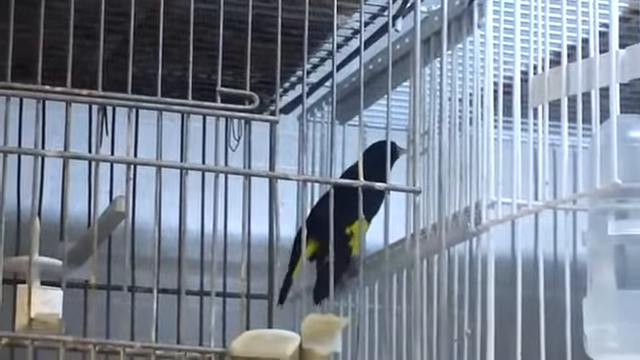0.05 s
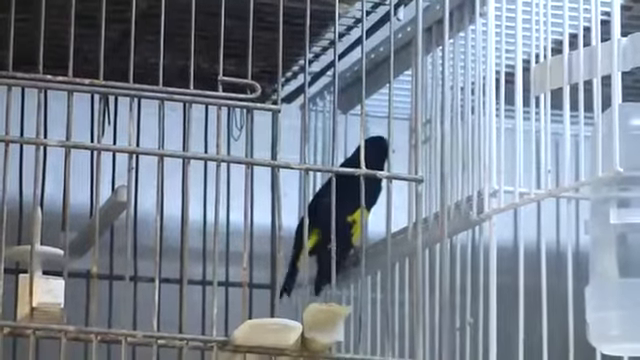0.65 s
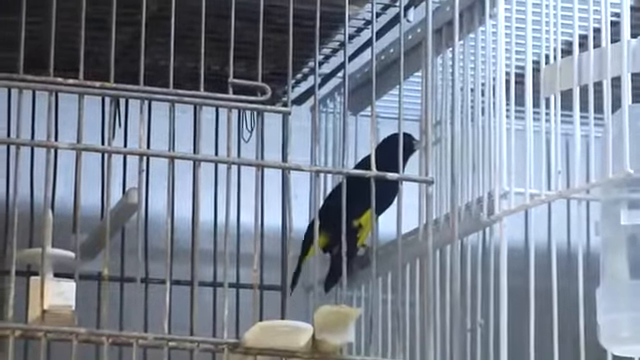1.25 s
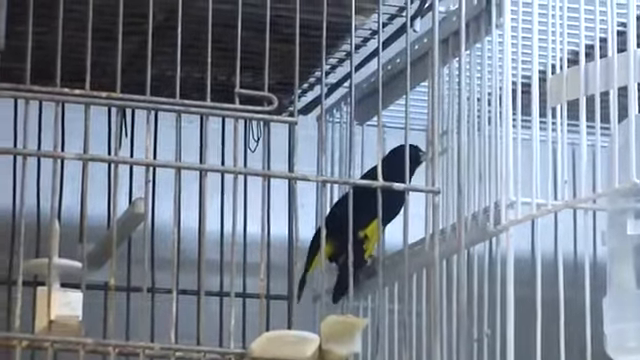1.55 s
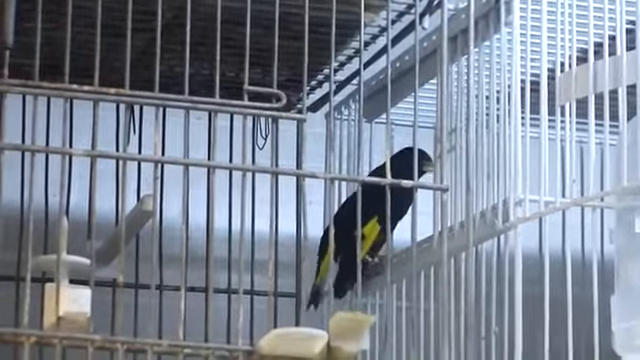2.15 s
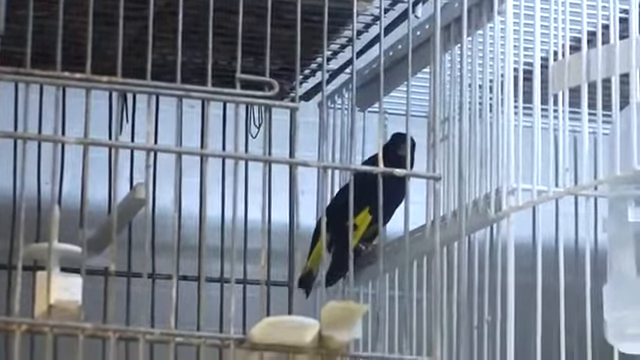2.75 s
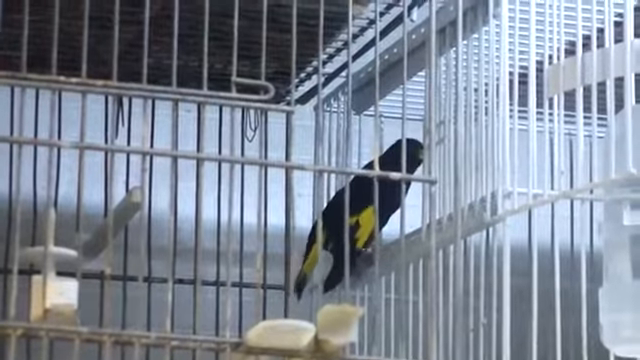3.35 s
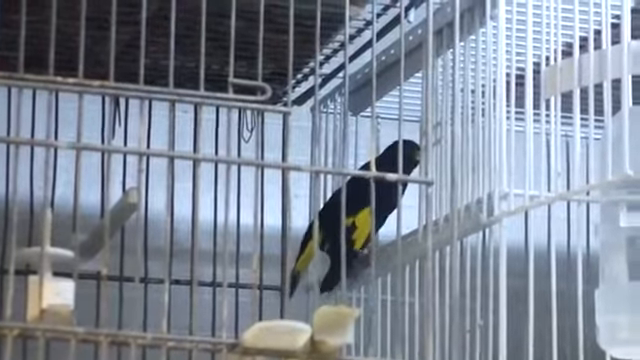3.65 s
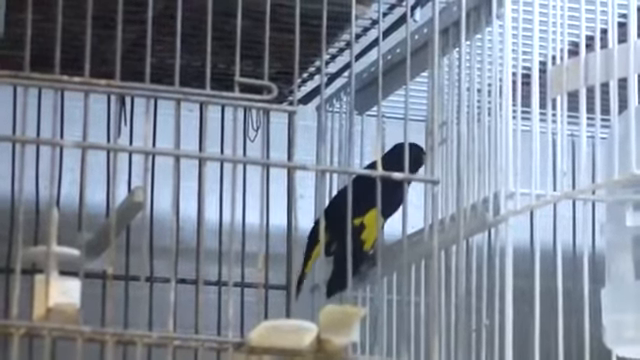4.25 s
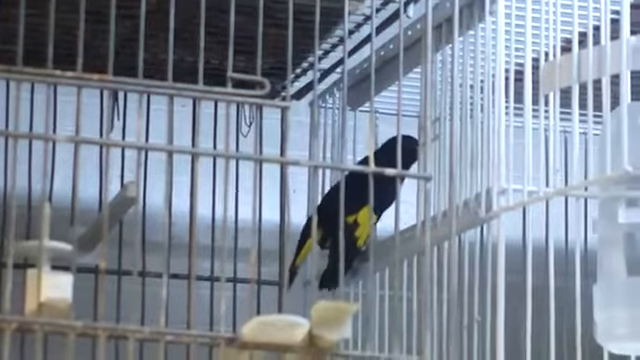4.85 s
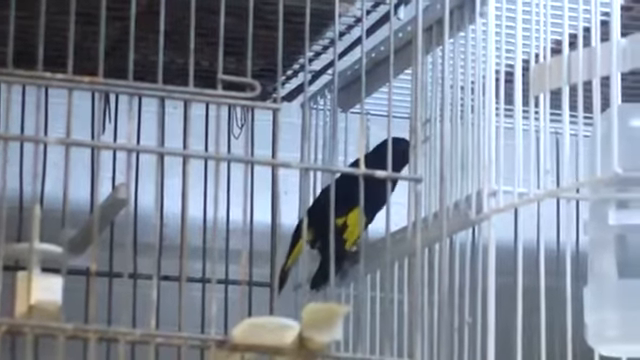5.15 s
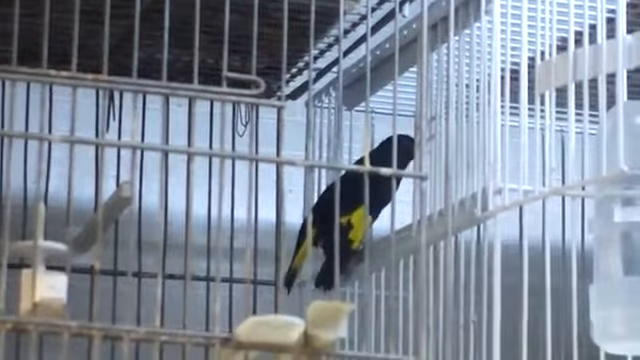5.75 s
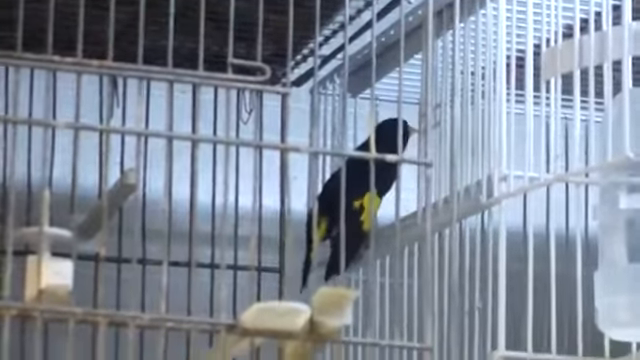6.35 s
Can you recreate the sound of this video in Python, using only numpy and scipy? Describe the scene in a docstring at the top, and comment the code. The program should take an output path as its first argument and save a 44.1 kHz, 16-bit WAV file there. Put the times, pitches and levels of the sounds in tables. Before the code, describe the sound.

A small finch sings in a wire cage in a hard-walled room. It opens with a nasal rising slur and a whistle, runs through quick chips and a high trill, then fast sweeps, hoarse chirps and harsh rasps. After a brief pause comes a loud rising note and more whistles, joined by a bright fluttering rustle. The bird sounds clear and fairly near, with a short ringing echo over faint low room noise and hiss.

```python
"""A small finch sings in a wire cage in a hard-walled room.
The two sides of its voice box (the syrinx) make nasal rising slurs, whistles, paired chips, a high
trill, fast sweeps and harsh rasps, shaped by its throat. The room smears every note over a low murmur
and a faint hiss, and a rustle joins near the end. A limiter turns everything down on the loudest notes."""
import sys
import numpy as np
from scipy import signal
from scipy.fft import rfft, irfft, next_fast_len
from scipy.io import wavfile
from scipy.ndimage import uniform_filter1d, minimum_filter1d

SR = 44100
rng = np.random.default_rng(int(sys.argv[2]) if len(sys.argv) > 2 else 0)


def generate_wav(signal):
    """Clip the signal to [-1, 1] and save it as 16-bit WAV at the path in sys.argv[1]."""
    frames = np.transpose(np.atleast_2d(signal))
    scaled = np.clip(frames, -1, 1) * 32767
    pcm = np.round(scaled).astype(np.int16)
    wavfile.write(sys.argv[1], SR, pcm)


N = 286650  # 6.5 seconds
TOP_HZ = 15300  # the sound is cut off above this


# Nasal notes, one list per note. Each row: time in seconds, pitch in Hz, level in dB,
# throat resonance in Hz, roughness from 0 to 1.
SLUR_NOTES = [
    [(.292, 1273, -29, 5000, 0.94), (.315, 1390, -19.5, 5270, 0.82), (.34, 1561, -21, 4840, 0.1),
     (.38, 1783, -20, 5500, 0.19), (.405, 1941, -22.5, 5750, 0.37), (.425, 2157, -20.5, 5540, 0.31),
     (.47, 2465, -22, 4600, 0.22), (.505, 2267, -22.5, 4550, 0.14), (.535, 2020, -25, 3940, 0.77),
     (.57, 2015, -34, 4430, 0.95), (.66, 2050, -55, 4470, 0.5)],
    [(2.417, 1197, -28, 5070, 1), (2.438, 1416, -19.5, 5070, 0.83), (2.475, 1542, -20, 5100, 0.2),
     (2.52, 1635, -24.5, 4570, 0.8), (2.56, 1850, -24.5, 5370, 0.4), (2.6, 2102, -24, 5930, 0.02),
     (2.625, 2205, -33, 6200, 0), (2.66, 2346, -32, 6540, 0.7)],
    [(2.757, 1783, -27, 4010, 0.74), (2.772, 2098, -19, 4140, 0.24), (2.787, 2463, -22.5, 4830, 0.27),
     (2.808, 2660, -34, 5200, 0.4)],
    [(5.257, 1090, -28, 4800, 0.5), (5.27, 1199, -20, 4300, 0.37), (5.282, 1342, -13, 4400, 0.21),
     (5.3, 1499, -16.5, 4100, 0.3), (5.312, 1630, -22, 4330, 0.3), (5.33, 1775, -22, 3640, 0.32),
     (5.36, 1998, -24.5, 2780, 0.38), (5.4, 2240, -27, 2400, 0.3), (5.42, 2466, -18.5, 2400, 0.06),
     (5.455, 2716, -21.5, 2580, 0.1), (5.5, 2953, -14.5, 2860, 0), (5.55, 3093, -18.5, 3060, 0),
     (5.6, 3270, -15, 3140, 0.02), (5.67, 3378, -22, 3300, 0), (5.69, 3374, -10.5, 3400, 0.02),
     (5.728, 3462, -21.5, 3400, 0.07)],
    [(6.272, 1431, -22.5, 5340, 0.63), (6.3, 1557, -20, 5160, 0), (6.32, 1664, -21, 4970, 0),
     (6.34, 1824, -23, 5340, 0.3), (6.36, 2097, -21, 5170, 0.12), (6.39, 2193, -22, 4800, 0.22),
     (6.425, 2180, -19, 4700, 0), (6.455, 2000, -27.5, 4400, 0.3), (6.5, 1874, -23, 4200, 0.2)],
]

def slurs(throat_width=0.2, leak_db=-26, jitter=0.062, air_db=-7):
    """A buzzy voice: the throat favours the harmonics (multiples of the pitch) near its resonance."""
    out = np.zeros(N)
    harmonic = np.arange(1, 10)[:, None]
    for rows in SLUR_NOTES:
        hz, db, throat_hz, rough = glide(rows)
        phase = syrinx(hz, jitter * rough, rate=1400)
        harmonic_hz = harmonic * hz
        ratio = harmonic_hz / throat_hz
        peak = np.exp(-.5 * (np.log(ratio) / throat_width) ** 2)
        leak = undb(leak_db) / (1 + (harmonic_hz / 6000) ** 2)
        low_side = np.where(ratio < 1, ratio ** 3, 0)  # 18 dB weaker per octave below the resonance
        gain = np.maximum(peak + leak, low_side)
        gain *= np.clip((TOP_HZ - harmonic_hz) / 2000, 0, 1)
        voice = (gain * np.sin(harmonic * phase)).sum(axis=0)
        voice /= np.sqrt((gain ** 2).sum(axis=0) / 2)
        voice *= 1 + rough * wobble(len(hz), rate=1300)
        # air escapes once a cycle while the voice is rough
        puffs = undb(air_db) * rough * breath(len(hz)) * (1 + np.sin(phase))
        # such a small beak gives off almost no bass
        note = colour((voice + puffs) * undb(db), [(700, -28), (1250, 1.0)])
        add(out, rows[0][0], fade(note, edge_s=0.002))
    return out


# Clear notes, one list per note. Each row: time in seconds, pitch in Hz, level in dB.
WHISTLE_NOTES = [
    [(.425, 4170, -26), (.465, 4250, -21.5), (.52, 4060, -23.5), (.557, 3964, -7), (.58, 4150, -35),
     (.6, 4224, -17), (.635, 4226, -17), (.67, 3840, -19.5), (.70, 3496, -24)],
    [(2.52, 3550, -28), (2.555, 4070, -24.5), (2.585, 4282, -17), (2.625, 4215, -24), (2.66, 3990, -20),
     (2.69, 3895, -18), (2.715, 3910, -24)],
    [(2.555, 2580, -42), (2.615, 3150, -35.5), (2.655, 3410, -23), (2.695, 3770, -21.5)],
    [(2.795, 3670, -14), (2.82, 4070, -19), (2.835, 4810, -19), (2.85, 4910, -16), (2.875, 4700, -19),
     (2.905, 4857, -12), (2.914, 4810, -27), (2.921, 3850, -26), (2.955, 3700, -27), (2.98, 3788, -10.5),
     (2.996, 3715, -27), (3.008, 3030, -33)],
    [(3.155, 2450, -50), (3.2, 2330, -46), (3.225, 2300, -50)],
    [(3.243, 3370, -32), (3.265, 3630, -33), (3.295, 3660, -40)],
    [(4.668, 3420, -54), (4.68, 3860, -31), (4.692, 4080, -44)],
    [(5.882, 5460, -26), (5.9, 5613, -20.5), (5.92, 5634, -15.5), (5.942, 5100, -20.5), (5.952, 5350, -19)],
    [(5.973, 2460, -24), (5.988, 2620, -20), (6.015, 2674, -25), (6.035, 2580, -23.5)],
    [(6.135, 5580, -26), (6.16, 5580, -22), (6.18, 5330, -14.5), (6.197, 5670, -28)],
    [(6.212, 2420, -24), (6.23, 2630, -21.5), (6.255, 2650, -22.5), (6.275, 2560, -32)],
    [(6.403, 4650, -18), (6.425, 4700, -25), (6.45, 4590, -37), (6.468, 4120, -17.5), (6.5, 3600, -26)],
]

def whistles(air_db=-22):
    """Almost pure gliding tones, with a little breath."""
    out = np.zeros(N)
    for rows in WHISTLE_NOTES:
        start = rows[0][0]
        hz, db = glide(rows)
        add(out, start, tone(hz, db, octave_db=-28.5, jitter=0.0085, shimmer=0.049))
        add(out, start, fade(breath(len(hz)) * undb(db + air_db)))
    return out


# Short two-voiced notes. Each row: start and length in seconds, the low voice's first and last pitch
# in Hz, the same for the high voice, the low voice's peak level in dB, the high voice in dB
# compared with the low one, each octave in dB compared with its voice.
CHIP_NOTES = [ (0.07, 0.04, 3610, 3880, 4740, 5190, -19.5, -4, -14),
              (0.675, 0.045, 3390, 3910, 4010, 4380, -26.5, 1.5, -11),
              (0.793, 0.049, 3334, 4000, 3890, 4410, -30.5, 2, -6),
              (0.916, 0.046, 3785, 4140, 4470, 4890, -25.5, -0.5, -5.5),
              (1.032, 0.046, 3820, 4290, 4640, 4970, -23.5, -3.5, -5.5),
              (1.137, 0.051, 3820, 4300, 4650, 5000, -24.5, -2, -5),
              (1.246, 0.053, 3910, 4264, 4775, 4966, -25, -2.5, -3.5),
              (1.361, .054, 3680, 4370, 4610, 5010, -24, -3.5, -4.5),
              (1.468, .054, 3836, 4370, 4690, 5100, -23, -3.5, -5),
              (1.574, 0.048, 3860, 4290, 4710, 5050, -23, -2.5, -4),
              (1.674, 0.046, 4217, 4445, 5570, 5170, -20.5, -2, -8.5), ]

def chips(bend=1.297):
    """Both sides of the syrinx glide at once, a few notes apart."""
    out = np.zeros(N)
    for start, length, low_from, low_to, high_from, high_to, db, high_db, octave_db in CHIP_NOTES:
        progress = np.linspace(0, 1, int(length * SR))
        swell_db = db + np.interp(progress, [0, 0.95, 1], [-6, 0, -5])
        low_hz = low_from + (low_to - low_from) * progress ** bend
        high_hz = high_from + (high_to - high_from) * progress ** bend
        add(out, start, tone(low_hz, swell_db, octave_db, jitter=0.008))
        add(out, start, tone(high_hz, swell_db + high_db, octave_db, jitter=0.014))
    return out


# Bell-like notes. Each row: start in seconds, upper pitch in Hz, its level in dB, lower pitch in Hz,
# its level in dB.
TRILL_NOTES = [(1.788, 7400, -22, 5680, -23.5), (1.873, 7410, -21, 5770, -22.5),
               (1.957, 7360, -21.5, 5680, -21), (2.045, 7320, -24, 5675, -21.5),
               (2.132, 7330, -21.5, 5760, -21.5), (2.235, 7230, -22.5, 5715, -22),
               (2.327, 7230, -20, 5680, -22.5)]
# How each voice moves. Each row: seconds into the note, pitch multiplier, level change in dB.
TRILL_UPPER = [(0, 1.017, -5), (.007, 1.014, -1), (.026, .997, 2), (.04, .965, -20)]
TRILL_LOWER = [(0, 1.02, -4.5), (.014, 1.04, -3.5), (.023, 1.0, -1), (.032, .965, 1.5), (.04, 0.963, -2.5)]
# Two faint tones, one below and one above. Each row: seconds into the note, pitch in Hz, level in dB.
TRILL_SIDE_TONES = [
    [(.012, 4520, -53), (.024, 4040, -47.5), (.038, 3610, -49.5)],
    [(.002, 9560, -49.5), (.014, 10350, -42.5), (.036, 10040, -59)],
]

def trill():
    """A run of high notes: in each, the upper voice peaks first and the lower swells in under it."""
    out = np.zeros(N)
    for start, upper_hz, upper_db, lower_hz, lower_db in TRILL_NOTES:
        for shape, hz, db in (TRILL_UPPER, upper_hz, upper_db), (TRILL_LOWER, lower_hz, lower_db):
            ratio, swell_db = glide(shape)
            add(out, start, tone(hz * ratio, db + swell_db, octave_db=-28, jitter=.006, shimmer=.08))
        for rows in TRILL_SIDE_TONES:
            add(out, start + rows[0][0], tone(*glide(rows), octave_db=-60, jitter=.025))
    return out


# Falling sweeps. Each row: start and length in seconds, first and last pitch in Hz, level in dB,
# level of the closing pip in dB.
FLICK_NOTES = [(2.916, 0.011, 6290, 4000, -27, -31), (2.989, .014, 6500, 3880, -23.5, -26),
               (3.074, .014, 6770, 4320, -23.5, -25), (3.188, 0.0095, 6730, 3980, -22, -24.5),
               (3.303, 0.0092, 6590, 4070, -20, -24), (5.821, 0.021, 7540, 4440, -18, -60),
               (6.066, 0.026, 7600, 4320, -18.5, -60)]

def flicks(pip_hz=6910, pip_s=0.013):
    """The pitch plunges and levels off, then a tiny high pip follows."""
    out = np.zeros(N)
    pip_pitch = np.full(int(pip_s * SR), pip_hz)
    for start, length, from_hz, to_hz, db, pip_db in FLICK_NOTES:
        fall = np.linspace(1, 0, int(length * SR)) ** 2
        hz = to_hz + (from_hz - to_hz) * fall
        add(out, start, tone(hz, db, octave_db=-15, jitter=0.038, shimmer=0.21))
        add(out, start + length, tone(pip_pitch, pip_db, octave_db=-24, jitter=0.047))
    return out


# Fast chirps. Each row: start in seconds, pitch multiplier for the two voices, level in dB.
CHIRP_NOTES = [(3.401, 1.024, -20.5), (3.509, 0.99, -20), (3.617, 1.01, -20), (3.75, 1.004, -19),
               (3.844, 1.035, -19.5), (3.945, .97, -20), (4.061, 1.01, -19.5), (4.182, 1.03, -19)]
# The three parts of a chirp. Each row: seconds into the chirp, pitch in Hz, level change in dB.
CHIRP_RISE = [(0, 2195, -25), (.009, 2903, -12), (.018, 3822, 0), (.027, 4900, -0.5), (.034, 4930, -17)]
CHIRP_FALL = [(.005, 5776, -9), (.012, 4670, -15), (.02, 3880, -2.5)]
CHIRP_END = [(.018, 5630, -13), (.026, 6344, -4), (.035, 6450, -2)]

def chirps(air_db=-7):
    """Two hoarse voices cross, one rising and one falling, and end on a high tip."""
    out = np.zeros(N)
    for start, ratio, db in CHIRP_NOTES:
        hz, swell_db = glide(CHIRP_RISE)
        add(out, start, tone(hz * ratio, db + swell_db, octave_db=-17, jitter=.09, shimmer=.7))
        add(out, start, fade(breath(len(hz)) * undb(db + swell_db + air_db)))
        hz, swell_db = glide(CHIRP_FALL)
        falling = tone(hz * ratio, db + swell_db, octave_db=-1, jitter=0.066, shimmer=0.98)
        add(out, start + CHIRP_FALL[0][0], falling)
        hz, swell_db = glide(CHIRP_END)
        tip = tone(hz, db + swell_db, octave_db=-2, jitter=0.02, shimmer=0.35)
        add(out, start + CHIRP_END[0][0], tip)
    return out


# Harsh notes. Each row: start and length in seconds, slaps per second, peak level in dB,
# throat resonance in Hz, treble boost in dB.
RASP_NOTES = [(0.526, 0.033, 999, -26, 3820, 6), (2.772, 0.031, 1095, -22.5, 4520, 8),
              (3.527, 0.039, 797.6, -21, 3670, 10), (4.22, 0.047, 1029, -18.5, 3820, 15.5),
              (4.327, 0.052, 716, -18, 3980, 5), (4.435, 0.075, 600, -19, 3520, 1.5),
              (4.562, 0.085, 598, -19.5, 3410, 2.5), (4.709, 0.075, 623, -18.5, 3290, 2.5),
              (4.846, 0.078, 639.3, -19, 3290, 0.5), (5.348, 0.039, 755, -20.5, 4330, 5)]
# What the open throat lets through. Each row: frequency as a multiple of its resonance, gain in dB.
OPEN_THROAT = [(.25, -51), (.38, -18.5), (.5, -6.5), (.75, 0), (1, 0), (1.3, 1), (1.6, -12), (2, -24.5),
               (3, -36.5), (4.5, -51)]

def rasps(jitter=.3, scatter_db=2):
    """The membranes of the syrinx slap unevenly; each slap rings the wide-open throat."""
    out = np.zeros(N)
    for start, length, rate_hz, db, throat_hz, treble_db in RASP_NOTES:
        swell_db, = glide([(0, -10), (length / 2, 0), (length, -8)])
        count = len(swell_db)
        cycles = syrinx(np.full(count, rate_hz), jitter, rate=700) // (2 * np.pi)
        slaps = np.diff(cycles, prepend=0) * undb(scatter_db * wobble(count, rate=900))
        voice = colour(slaps, [(ratio * throat_hz, gain) for ratio, gain in OPEN_THROAT])
        voice = colour(voice, [(5000, 0), (8000, treble_db)])
        add(out, start, fade(unit(voice) * undb(db + swell_db)))
    return out


def syrinx(hz, jitter, rate):
    """Phase (place in the cycle) of a vibrating membrane; jitter makes its pitch tremble."""
    trembling_hz = hz * (1 + jitter * wobble(len(hz), rate))
    return 2 * np.pi * np.cumsum(trembling_hz) / SR


def tone(hz, db, octave_db, jitter, shimmer=0):
    """One side of the syrinx sings a pitch and its octave; shimmer shakes the level for hoarseness."""
    phase = syrinx(hz, jitter, rate=1500)
    size = np.sqrt(2) * undb(db) * (1 + shimmer * wobble(len(hz), rate=2200))
    wave = np.sin(phase) + undb(octave_db) * np.sin(2 * phase)
    return fade(size * wave, edge_s=0.0021)


def breath(count):
    """Air rushes through the open beak."""
    beak = [(1200, -22.5), (2500, -15), (4500, 2.5), (7000, -1.5), (10000, -12.5)]
    return unit(colour(rng.standard_normal(count), beak))


# Where the room rings most. Each row: pitch in Hz, level in dB compared with the direct sound.
ROOM_RINGS = [(2424, -9), (2620, -7.5), (2952, 3.5), (3233, 2.5), (3394, 7), (3805, 2), (3963, -12),
              (4218, -10), (4512, -6), (4745, -8), (4877, 12.5), (5304, -19), (5634, -17), (7286, -4)]

def room(song, direct_db=-6, cage_db=-7, walls_db=-6, tail_db=-10):
    """The cage and close walls throw back quick, dense echoes; the room rings on longer and duller."""
    t = np.arange(int(.8 * SR)) / SR
    fall_db = -60 * t  # divided below by the seconds each echo takes to drop 60 dB
    noise = rng.standard_normal((3, len(t)))
    cage = unit(noise[0] * undb(fall_db / 0.028) * (t > .001))
    walls = unit(noise[1] * undb(fall_db / 0.18) * (t > .004))
    tail = unit(noise[2] * undb(fall_db / 0.35) * np.minimum(t / 0.036, 1))
    tail = colour(tail, [(4500, 0.0038), (10000, -5)])
    echoes = (undb(cage_db) * cage + undb(walls_db) * walls + undb(tail_db) * tail) / np.sqrt(len(t))
    decay = undb(fall_db / 0.2)
    rings = sum(undb(db) * np.cos(2 * np.pi * hz * t) for hz, db in ROOM_RINGS)
    rings *= undb(direct_db) * 2 * decay / decay.sum()
    return undb(direct_db) * song + signal.fftconvolve(song, echoes + rings)[:N]


# How far the murmur is turned up or down. Each row: time in seconds, level in dB before the boost.
MURMUR_VOLUME_CURVE = [(0.0, -49.5), (0.31, -47.5), (0.43, -55.5), (1.03, -46), (1.25, -48.5), (1.52, -44),
                       (1.9, -48.5), (2.43, -49), (2.48, -55.5), (2.64, -57.5), (2.79, -52), (2.86, -60),
                       (3.19, -50), (3.37, -53), (3.64, -49.5), (3.82, -52), (3.84, -49.5), (3.89, -53.5),
                       (4.34, -49), (5.19, -48), (5.36, -52), (5.5, -48), (5.54, -54), (5.9, -51.5),
                       (5.96, -56), (6.06, -50), (6.28, -51.5), (6.35, -58), (6.48, -56.5), (6.5, -52)]
# Its balance of low and high. Each row: frequency in Hz, relative strength in dB.
MURMUR_TONE = [(25, -16.5), (45, -12.5), (62, -4.5), (85, -7), (160, -9.5), (230, -0.5), (450, 3),
               (700, -1), (1100, -4.5), (2000, -9), (3500, -16.5), (6000, -21), (15000, -34)]

def murmur(boost_db=2):
    """A low murmur whose level sinks and swells along a set curve."""
    return undb(boost_db) * shaped_noise(MURMUR_VOLUME_CURVE, MURMUR_TONE)


# The rustle's loudness. Each row: time in seconds, level in dB.
RUSTLE_LEVELS = [(5.87, -46), (5.91, -38.5), (5.96, -32.5), (6.1, -30), (6.25, -29), (6.36, -28),
                 (6.5, -32.5)]
# Its balance of low and high. Each row: frequency in Hz, relative strength in dB.
RUSTLE_TONE = [(900, -45), (1350, -19), (1600, -6.5), (2500, -5.5), (4000, 0.5), (5500, 0), (7000, -6),
               (10000, -11.5), (15000, -18)]

def rustle(flutter_db=3):
    """A bright, fluttering noise joins near the end."""
    noise = shaped_noise(RUSTLE_LEVELS, RUSTLE_TONE)
    flutter = undb(flutter_db * wobble(N, rate=60))
    started = np.arange(N) / SR > RUSTLE_LEVELS[0][0]
    return noise * flutter * started


# The hiss's loudness. Each row: time in seconds, level in dB.
HISS_LEVELS = [(0, -53), (.6, -57), (1.1, -45.5), (2.3, -48), (2.7, -52), (3.3, -38.5), (4.2, -46),
               (4.7, -58), (5.2, -60), (5.8, -49), (6.5, -55)]
# Its balance of low and high. Each row: frequency in Hz, relative strength in dB.
HISS_TONE = [(1200, -21.5), (3000, -4), (4500, -8.5), (7000, 0), (10000, -6), (15000, 1)]

def hiss():
    """A faint high noise slowly swells and fades."""
    return shaped_noise(HISS_LEVELS, HISS_TONE)


def shaped_noise(levels, points):
    """Filtered noise whose loudness follows (seconds, dB) rows."""
    db = np.interp(np.arange(N) / SR, *np.transpose(levels))
    return unit(colour(rng.standard_normal(N), points)) * undb(db)


def undb(db):
    """Turn decibels into a multiplier."""
    return 10 ** (np.asarray(db) / 20)


def unit(x):
    """Scale to an average strength (rms) of 1."""
    return x / np.sqrt(np.mean(x ** 2) + 1e-18)


def add(out, start, x):
    """Mix a sound in at a start time in seconds."""
    i = max(int(start * SR), 0)
    out[i:i + len(x)] += x[:max(N - i, 0)]


def glide(rows):
    """Join (seconds, values..) rows with straight lines: one curve per value column."""
    times, *columns = np.transpose(rows)
    count = max(int((times[-1] - times[0]) * SR), 64)
    t = times[0] + np.arange(count) / SR
    return [np.interp(t, times, column) for column in columns]


def colour(x, points):
    """Turn frequencies up or down along (Hz, dB) points."""
    hz, db = np.transpose(points)
    size = next_fast_len(2 * len(x))
    freqs = np.maximum(np.fft.rfftfreq(size, 1 / SR), 1)
    gain = undb(np.interp(np.log(freqs), np.log(hz), db))
    return irfft(rfft(x, size) * gain, size)[:len(x)]


def wobble(count, rate):
    """A random curve, roughly 1 in size, that picks a new value rate times a second."""
    i = np.arange(count)
    return np.interp(i * min(rate / SR, 1), i, rng.standard_normal(count))


def fade(x, edge_s=0.0026):
    """Open and close a note softly."""
    i = np.arange(len(x))
    ramp = np.minimum(np.minimum(i, i[::-1]) / (edge_s * SR), 1)
    return x * np.sin(np.pi / 2 * ramp) ** 2


def scene():
    """The finch in its room, over the background noises."""
    song = slurs() + whistles() + chips() + trill() + flicks() + chirps() + rasps()
    return (room(song) + rustle() + murmur() + hiss())[None]


# Dull top treble, with a deep dip near 11.5 kHz. Each row: frequency in Hz, gain in dB.
TREBLE_SHAPE = [(20, 0), (10300, 1), (11000, -4), (11500, -48), (14300, -9), (15100, -37)]

def record(dry, limit_db=-15, ratio=3):
    """The top treble is dulled, and cut above 15 kHz; a limiter holds down the loudest notes."""
    x = colour(dry[0], TREBLE_SHAPE)
    window = 441  # samples, a hundredth of a second
    loudness = np.sqrt(np.abs(uniform_filter1d(x ** 2, window)))
    gain = np.maximum(loudness / undb(limit_db), 1) ** (1 / ratio - 1)
    smooth_gain = uniform_filter1d(minimum_filter1d(gain, window), window)
    treble_cut = signal.ellip(8, .2, 70, TOP_HZ, fs=SR, output="sos")
    return signal.sosfilt(treble_cut, x * smooth_gain)[None]


dry = scene()
out = record(dry)
generate_wav(out)
```